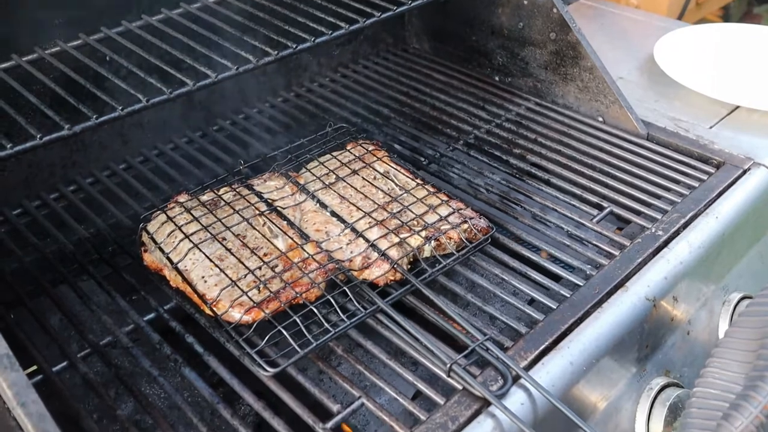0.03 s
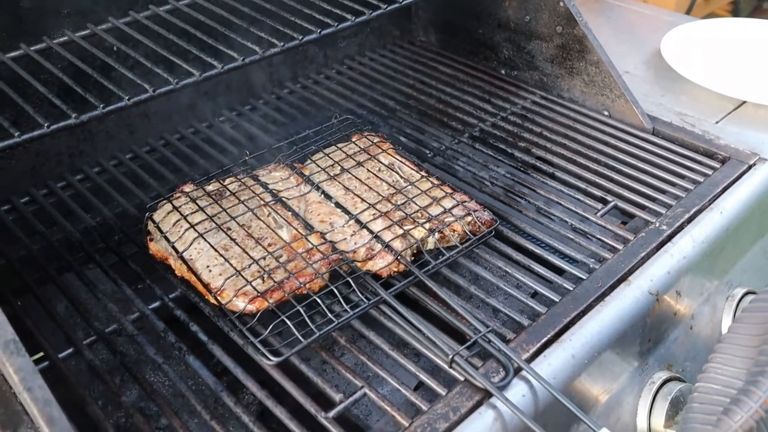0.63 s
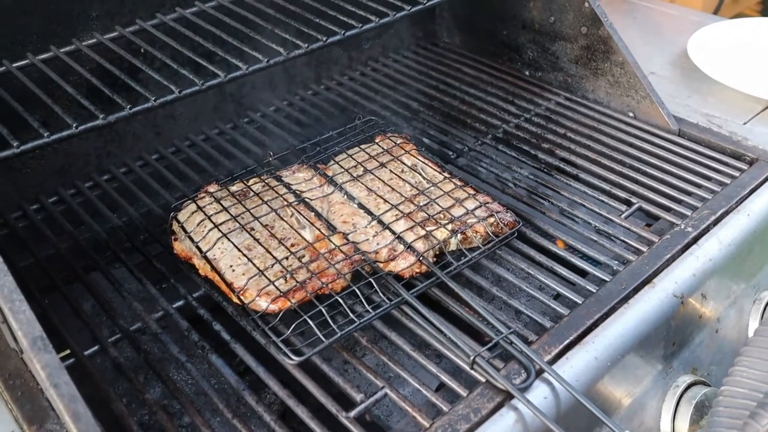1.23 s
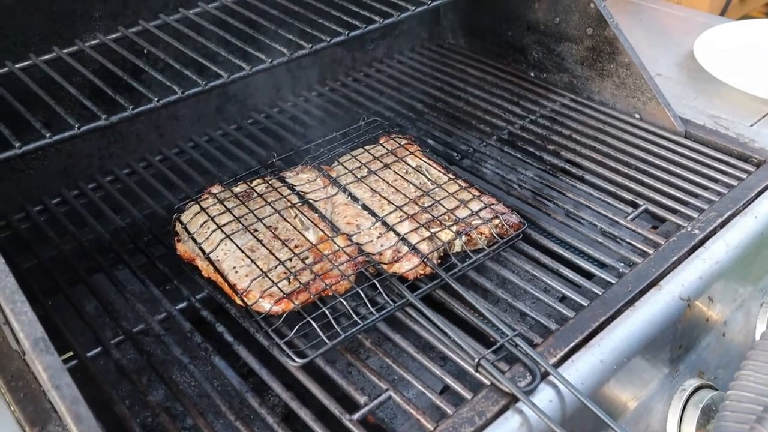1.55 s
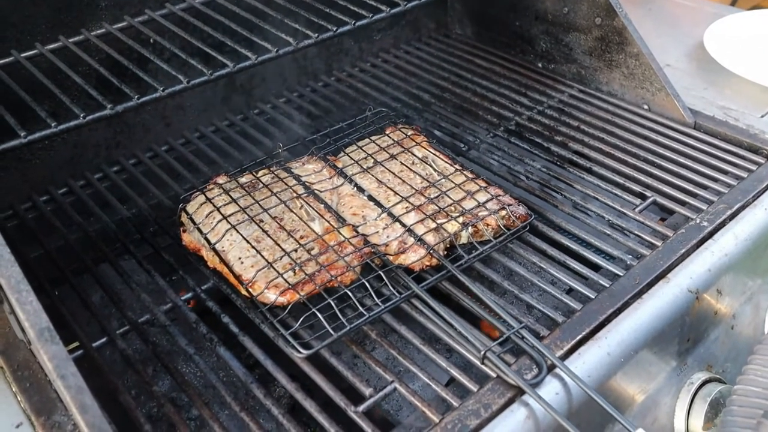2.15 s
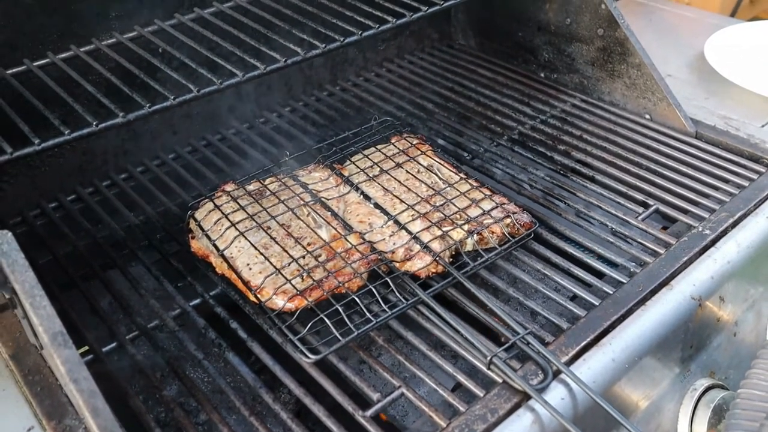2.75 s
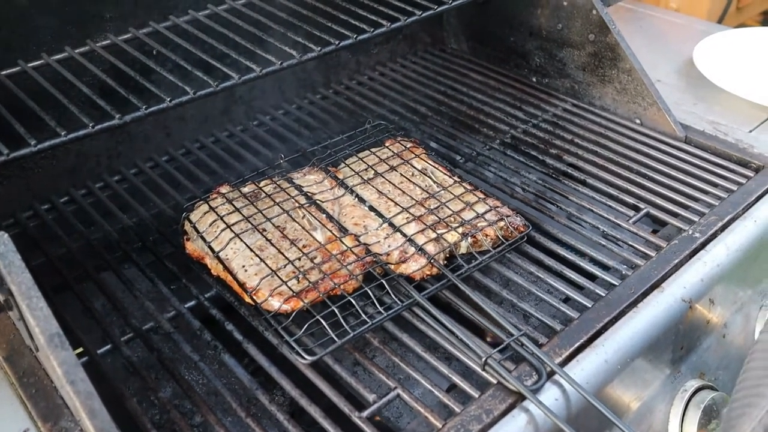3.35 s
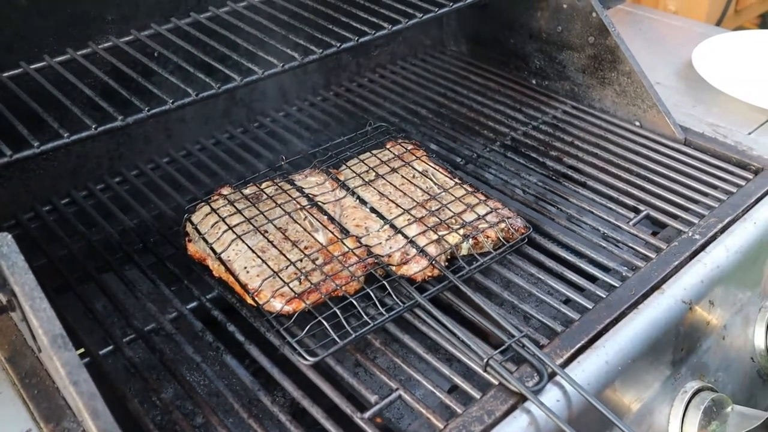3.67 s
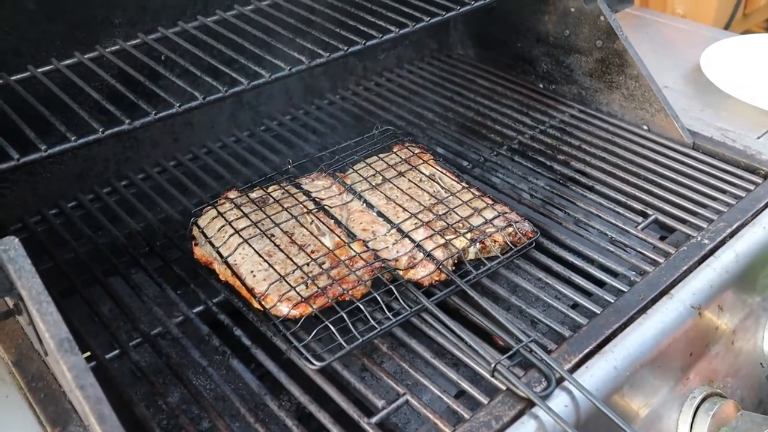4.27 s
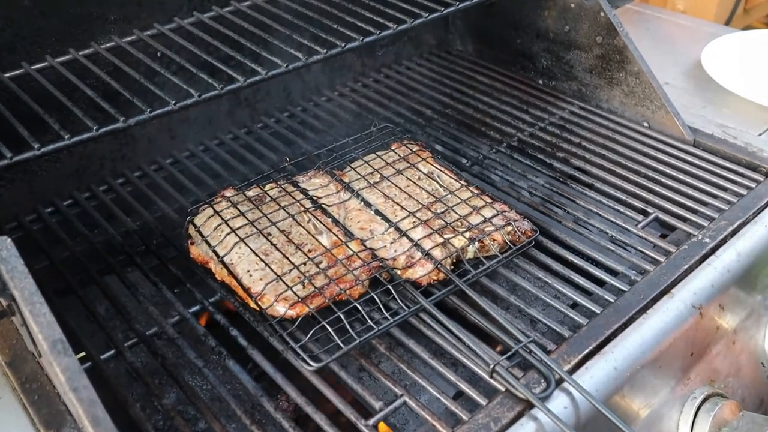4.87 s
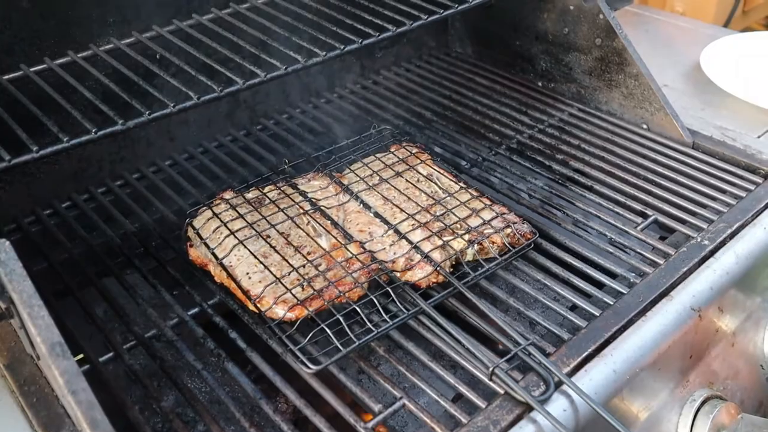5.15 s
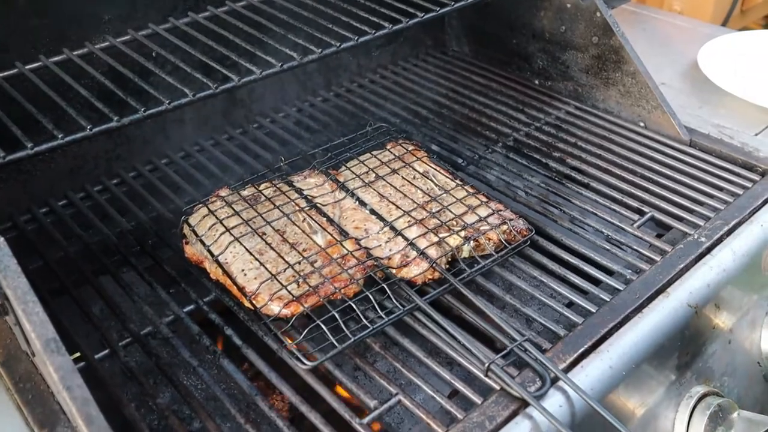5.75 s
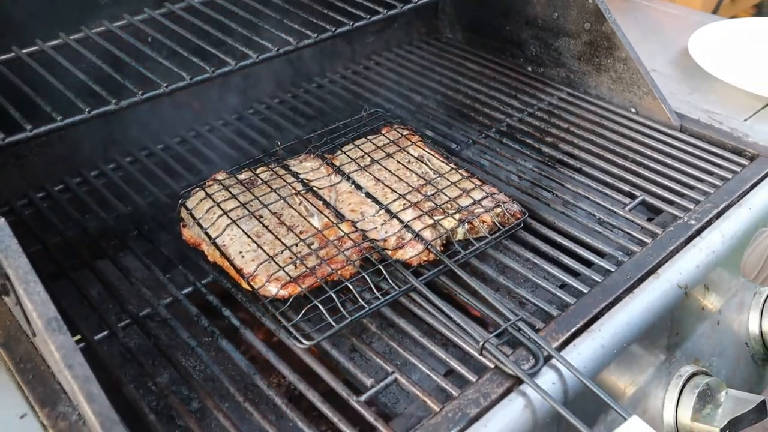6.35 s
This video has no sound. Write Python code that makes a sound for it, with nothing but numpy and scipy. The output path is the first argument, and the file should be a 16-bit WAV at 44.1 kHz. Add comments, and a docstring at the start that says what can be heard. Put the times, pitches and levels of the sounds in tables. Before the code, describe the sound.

Close to an outdoor gas grill, meat hisses and fizzes without a break while beads of fat pop over the quiet rush of the flames. Past the middle comes a dull sliding scuff, then two hard clacks in quick succession, the second ringing like metal. A moment later fat catches fire in a short crackling burst inside the steel grill, and the sizzling carries on.

```python
"""Steaks on a gas grill

Steaks sizzle in a wire basket on an open grill outdoors, over the low rush of the burners.
Juice boils into tiny bursting bubbles on the hot bars, and beads of fat spit. Something is shifted
with a soft scuff and two sharp clacks, then dripping fat flares up and crackles in the steel firebox."""
import sys
import numpy as np
from scipy import signal
from scipy.fft import rfft, irfft
from scipy.io import wavfile

SR = 44100
rng = np.random.default_rng(int(sys.argv[2]) if len(sys.argv) > 2 else 0)


def transcribe(u):
    """Save the signal u as a 16-bit wav file named by the first command-line argument.

    u: samples, shape (n,) or (channels, n), limited to [-1, 1]; the rate is SR.
    q: integer samples, one column per channel.
    """
    v = np.clip(np.atleast_2d(u).T, -1, 1)
    q = np.round(v * 32767).astype(np.int16)
    wavfile.write(sys.argv[1], SR, q)


N = 283111
TIME = np.arange(N) / SR

# Levels in the tables are relative: the functions set the final loudness.
# tone of the gas flames: f/Hz, level/dB
BURNER_TONE = [(15, -28), (28, -18), (48, -2), (75, -1), (140, -0.5), (250, -0.5), (400, -3.5), (700, -5),
               (1400, -12), (3000, -24)]
# short pushes of something sliding nearby: t/s, level/dB
PUSHES = [(4.305, -37), (4.52, -39), (4.655, -41)]
# tone of the sliding: f/Hz, level/dB
SCUFF_TONE = [(100, -27), (280, -6.5), (650, 1.5), (1200, -3), (2000, -10), (4000, -39)]
# hard things knocking together: t/s, level/dB, lowest f/Hz, highest f/Hz, metal ring level/dB
KNOCK_HITS = [(1.073, -37.5, 130, 1780, -18), (2.526, -32.5, 396, 1380, -25),
              (4.6552, -21.5, 7600, 9100, -21), (4.667, -28, 900, 1830, -25), (4.822, -32, 197, 1400, -25),
              (4.98, -15.5, 5740, 12200, -25), (4.983, -9.5, 685, 8300, -22),
              (5.202, -31.5, 403, 1200, -27), (5.255, -26.5, 80, 1130, -25), (5.2657, -10, 214, 4860, 0.5)]
# notes of the hollow body that each knock sets ringing: f/Hz, level/dB, t60/s (time to fade by 60 dB)
BODY_NOTES = [(335, -14.5, 0.057), (489, -15, 0.069), (762, -25.5, 0.82), (1088, -16.5, .25),
              (1275, -2.5, 0.04), (1390, -1, 0.049), (1840, -18, 0.16), (3180, -2, 0.068),
              (3720, -6, 0.083), (4570, -12.5, .08)]
# longer notes of struck metal: f/Hz, level/dB, t60/s
METAL_NOTES = [(1330, -27.5, 0.71), (1590, -16, 0.17), (1745, -17, 0.13), (1960, -22.5, 0.75),
               (2050, -21.5, 0.65), (2410, -21, 0.27), (2880, -24, 0.46), (3690, -18, 0.27),
               (4100, -16, 0.24)]
# how long the surroundings clatter after a knock: f/Hz, t60/s
CLATTER_FADE = [(150, 0.4), (400, .3), (750, 0.79), (1500, 0.38), (3000, 0.37), (6000, 0.11),
                (14000, 0.065)]
# pitches at which the steel firebox rings: f/Hz, width/Hz, level/dB
FIREBOX_NOTES = [(830, 130, -0.5), (1332, 58, 6.5), (1396, 72, 6), (1986, 220, -0.5), (2220, 28, -14),
                 (4265, 103, 4), (5050, 180, -1), (6750, 45, -11)]
# tone of the burning fat: f/Hz, level/dB
FLARE_TONE = [(60, -14), (170, -1), (260, 6), (420, -3), (700, -2.5), (1100, -8.5), (1400, -4), (2200, 1.5),
              (3000, -3), (4400, -1), (6800, -10), (14000, -25)]
# the loudest beads of fat bursting: t/s, level/dB, centre f/Hz
BIG_SPITS = [(.2345, -28, 3600), (.263, -30, 3400), (0.5013, -22, 5900), (.9937, -21.5, 5540),
             (1.0723, -26, 3900), (1.166, -23.5, 6200), (1.7228, -20.5, 6200), (2.0994, -25, 4800),
             (2.7662, -23, 5300), (2.8214, -19, 4680), (2.85, -19, 5330), (3.0251, -22.5, 4430),
             (3.278, -27, 4300), (3.9199, -25, 4200), (4.656, -23, 5950), (4.8221, -26, 4230),
             (5.1902, -20.5, 5200), (5.5558, -24, 5600), (5.9928, -17.5, 4730), (6.027, -24.5, 2700),
             (6.0395, -24, 3000), (6.0766, -18, 3300), (6.1223, -22, 3430), (6.1925, -21, 4400),
             (6.303, -25, 3570)]
# how hard the juice boils on the bars: t/s, level/dB
BOIL_STRENGTH = [(0.0, -30), (0.39, -29.5), (0.8, -30.5), (1.12, -30), (2.11, -31.5), (2.72, -28.5),
                 (2.93, -30), (4.27, -30.5), (5.02, -28), (5.51, -31), (6.06, -28.5), (6.42, -30)]
# tone of the sizzle: f/Hz, level/dB
SIZZLE_TONE = [(150, -23.5), (500, -17), (1000, -10.5), (1700, -10), (2600, -6.5), (4000, -2.5),
               (5800, -3.5), (6700, 0.5), (7200, -1.3), (8000, -3.5), (10000, -7.5), (12900, -18.5),
               (14300, -17), (16000, -32)]


def from_db(db):
    """Turn decibels into a number to multiply by."""
    return 10 ** (np.asarray(db) / 20)


def rms_one(x):
    """Scale a signal so that its average strength (rms) is 1."""
    return x / np.sqrt(np.mean(x ** 2) + 1e-20)


def at_hz(points, hz):
    """Read between the rows of a table, with every octave equally wide."""
    known_hz, values = np.transpose(points)
    return np.interp(np.log(np.maximum(hz, 1)), np.log(known_hz), values)


def add(out, start_s, sound):
    """Mix a sound in at a given time."""
    start = round(start_s * SR)
    out[start:start + len(sound)] += sound[:N - start]


def drift(per_s):
    """A random wobble of strength 1 that heads for a new value per_s times a second."""
    targets = rng.standard_normal(2 ** 13)
    return rms_one(np.interp(TIME * per_s, np.arange(len(targets)), targets))


def swell(start_s, rise_s, hold_s, t60_s):
    """A loudness curve that rises, holds and dies away."""
    age = TIME - start_s
    return np.clip(age / rise_s, 0, 1) * from_db(-60 * np.maximum(age - rise_s - hold_s, 0) / t60_s)


def band(x, low_hz, high_hz, order=2):
    """Keep what lies between two frequencies; a higher order cuts more steeply."""
    edges_hz = [low_hz, min(high_hz, .45 * SR)]
    return signal.sosfilt(signal.butter(order, edges_hz, "band", fs=SR, output="sos"), x)


def with_tone(x, tone, size=8192):
    """Filter a sound to follow a tone table; strength 1."""
    gains = from_db(at_hz(tone, np.fft.rfftfreq(size, 1 / SR)))
    cepstrum = irfft(np.log(gains))   # this route makes the filter ring after a click, never before
    response = irfft(np.exp(rfft(2 * cepstrum[:size // 2], size)))
    return rms_one(signal.fftconvolve(x, response)[:N])


def clicks(per_s, spread_db, largest):
    """Random clicks whose sizes span up to largest times spread_db; strength 1."""
    sizes = from_db(spread_db * np.minimum(rng.exponential(1, N), largest))
    return rms_one(sizes * rng.choice([-1, 1], N) * (rng.random(N) < per_s / SR))


def puffs(per_s, spread_db, length_s):
    """Random bursts of noise that start at once and die quickly; strength 1."""
    kicks = clicks(per_s, spread_db, largest=2.84) ** 2 + 1e-18
    energy = signal.lfilter([1], [1, -np.exp(-2 / (length_s * SR))], kicks)
    return rms_one(np.sqrt(energy) * rng.standard_normal(N))


def ring(notes, t):
    """After one blow, each note of an object fades at its own speed."""
    return sum(from_db(db - 60 * t / t60) * np.sin(2 * np.pi * hz * t) * rng.choice([-1, 1])
               for hz, db, t60 in notes)


def firebox(x, ring_db):
    """The open steel box adds its own ringing to a sound."""
    return x + sum(from_db(db + ring_db) * signal.lfilter(*signal.iirpeak(hz, hz / width, SR), x)
                   for hz, width, db in FIREBOX_NOTES)


def burners(level_db=-46.0, flutter_db=1.0):
    """The gas flames make a steady, slightly fluttering rush."""
    return from_db(level_db + flutter_db * drift(16)) * with_tone(rng.standard_normal(N), BURNER_TONE)


def scuff(uneven_db=2.5):
    """Many little slips blur into a dull rubbing that swells with each push."""
    slips = clicks(per_s=3000, spread_db=3.5, largest=3.5)
    pushes = sum(from_db(db) * swell(s, rise_s=0.035, hold_s=0.015, t60_s=0.62) for s, db in PUSHES)
    return pushes * from_db(uneven_db * drift(50)) * with_tone(slips, SCUFF_TONE)


def knocks(gain_db=-18.0, crack_db=-2.5, crack_s=0.0067, body_db=-2.0, clatter_db=-16.0, spill_db=-19.0):
    """Hard things meet with a crack, then ring and clatter; soft contacts have less treble."""
    out, t = np.zeros(N), TIME[:SR * 3 // 4]
    edges_hz = 100 * 2 ** np.arange(0, 7.6, .5)   # half an octave apart
    for s, db, low_hz, high_hz, metal_db in KNOCK_HITS:
        crack = 3 * band(rng.standard_normal(len(t)), 150, 14000, order=1) * np.exp(-t / crack_s)
        clatter = np.zeros(len(t))
        for low, high in zip(edges_hz, edges_hz[1:]):
            fade = from_db(-60 * t / at_hz(CLATTER_FADE, low))
            clatter += 3 * band(rng.standard_normal(len(t)), low, high) * fade
        hit = from_db(crack_db) * crack + from_db(clatter_db) * clatter
        hit += from_db(body_db) * ring(BODY_NOTES, t) + from_db(metal_db) * ring(METAL_NOTES, t)
        core = band(hit, low_hz, high_hz, order=5)
        spill = from_db(spill_db) * band(hit, low_hz / 4, high_hz * 2)   # a little extra bass and treble
        add(out, s, from_db(db + gain_db) * rms_one(core + spill))
    return out


def flare_up(start_s=5.925, rise_s=0.057, flash_db=-32, burn_db=-35.5, flicker_db=2.8,
             crackle_db=-4.0, roar_db=-4.0, hiss_db=-6.0, hiss_lead_s=0.04):
    """Fat turns to vapour with a hiss, then catches fire in the box, which rings with its crackling."""
    crackle = from_db(crackle_db) * clicks(per_s=1800, spread_db=3.0, largest=2.0)
    roar = from_db(roar_db) * rng.standard_normal(N)
    fire = rms_one(firebox(with_tone(crackle + roar, FLARE_TONE), ring_db=6.0))
    flash = from_db(flash_db) * swell(start_s, rise_s, hold_s=0.077, t60_s=0.12)
    burn = from_db(burn_db) * swell(start_s, rise_s, hold_s=0.27, t60_s=0.26)
    blaze = flash + burn   # the vapour flashes; a lower flame lasts until the fat is used up
    flames = blaze * from_db(flicker_db * drift(70)) * fire
    early_blaze = np.interp(TIME + hiss_lead_s, TIME, blaze)
    hiss = early_blaze * rms_one(band(rng.standard_normal(N), 5400, 8400))
    return flames + from_db(hiss_db) * hiss


def small_spits(per_s=5.5, typical_db=-30.5, spread_db=2.4, typical_hz=4570, spread_octaves=0.27):
    """Small beads burst at random, louder when the juice boils harder; rows as in BIG_SPITS."""
    count = 128
    times = (np.arange(count) + rng.random(count)) / per_s   # one in each short stretch of time
    size, pitch = rng.standard_normal((count, 2)).T
    boil_s, boil_db = np.transpose(BOIL_STRENGTH)
    db = typical_db + spread_db * size + np.interp(times, boil_s, boil_db - boil_db.mean())
    hz = typical_hz * 2 ** (spread_octaves * pitch)
    return [row for row in zip(times, db, hz) if row[0] < TIME[-1]]


def spits(gain_db=-7.5, length_s=0.0035, width_ratio=1.62, thud_db=-7.5, ragged_db=2.5, top_hz=12000):
    """A bead of fat tears open in a short, ragged burst; lower-pitched spits have a fuller thud."""
    out, t = np.zeros(N), TIME[:SR // 40]
    scatter = 0.074 * np.exp(-t / 0.0039)   # sound bouncing off the steel walls
    fade = np.exp(-(t / length_s) ** 2) + scatter
    for s, db, hz in list(BIG_SPITS) + small_spits():
        noise = rng.standard_normal((2, len(t)))
        tear, thud = noise * from_db(ragged_db * rng.standard_normal(len(t))) * fade
        tear = band(tear, hz / width_ratio, min(hz * width_ratio, top_hz))
        thud = from_db(thud_db) * (4500 / hz) ** 2 * band(thud, 1210, 3800)
        add(out, s, from_db(db + gain_db) * rms_one(tear + thud))
    return firebox(out, ring_db=-5.0)


def sizzle(fizz_db=-2.5, steam_db=-2.0, sputter_db=-8.0, crackle_db=-8.0, tick_db=-13.0, uneven_db=1.48):
    """Countless tiny bubbles burst, steam hisses out, larger bubbles puff and droplets tick."""
    fizz = clicks(per_s=7000, spread_db=4.0, largest=4.1)
    ticks = clicks(per_s=90, spread_db=-0.5, largest=2.3)
    crackle = puffs(per_s=60, spread_db=7.0, length_s=0.0017)
    steam = rng.standard_normal(N)
    bubble_bands_hz = [(700, 3650), (1800, 6200), (3500, 8800), (6000, 11400)]   # large to small bubbles
    sputter = rms_one(sum(band(puffs(per_s=150, spread_db=4.0, length_s=0.0016), low, high)
                          for low, high in bubble_bands_hz))
    juice_flow = from_db(uneven_db * drift(60))   # juice arrives unevenly
    boil = juice_flow * (from_db(fizz_db) * fizz + from_db(sputter_db) * sputter)
    boil += from_db(steam_db) * steam + from_db(crackle_db) * crackle + from_db(tick_db) * ticks
    loudness = from_db(np.interp(TIME, *np.transpose(BOIL_STRENGTH)))
    return loudness * firebox(with_tone(boil, SIZZLE_TONE), ring_db=-10.0)


def scene():
    """Add up all the sounds, the same on the left and the right."""
    mono = sizzle() + flare_up() + burners() + scuff() + knocks() + spits()
    return np.stack([mono, mono])


def record(dry, cutoff_hz=16000):
    """Round off the tallest peaks and cut the very highest treble."""
    return signal.sosfilt(signal.ellip(10, .1, 80, cutoff_hz, fs=SR, output="sos"), np.tanh(dry))


dry = scene()
out = record(dry)
transcribe(out)
```